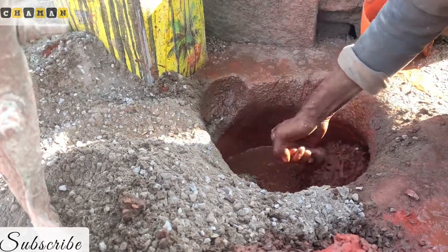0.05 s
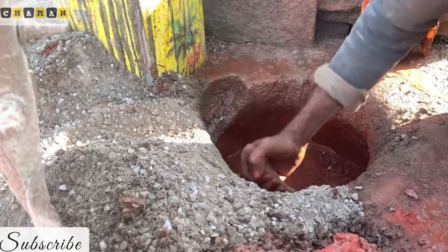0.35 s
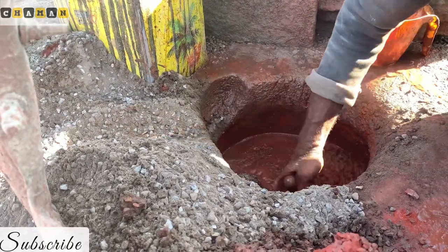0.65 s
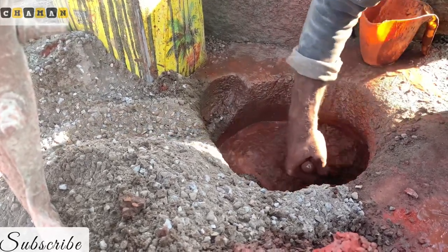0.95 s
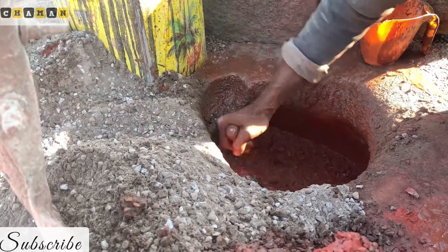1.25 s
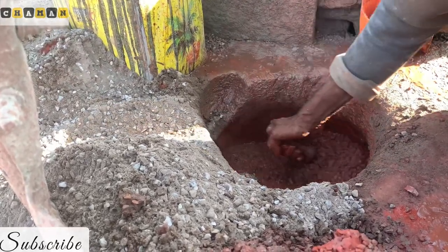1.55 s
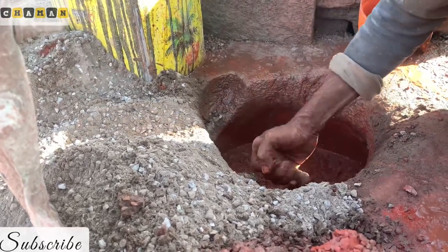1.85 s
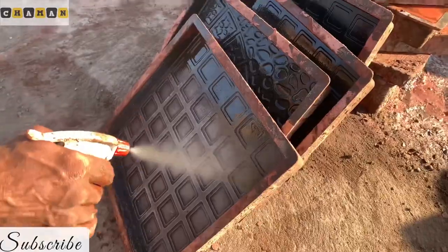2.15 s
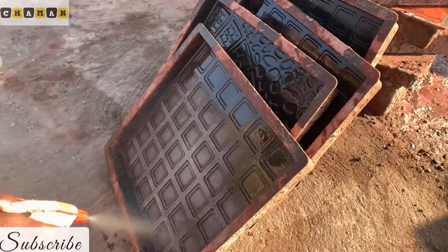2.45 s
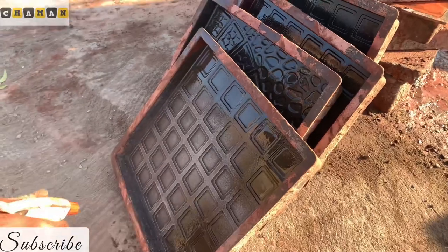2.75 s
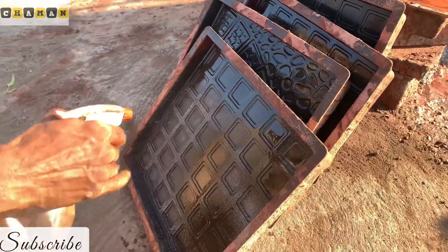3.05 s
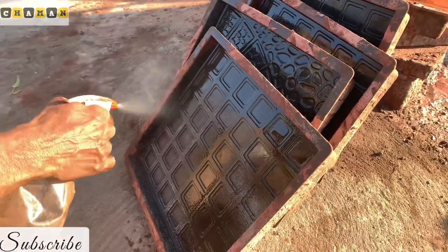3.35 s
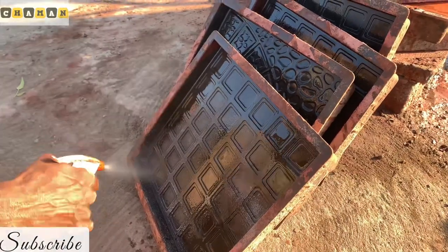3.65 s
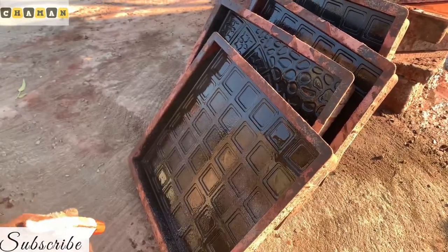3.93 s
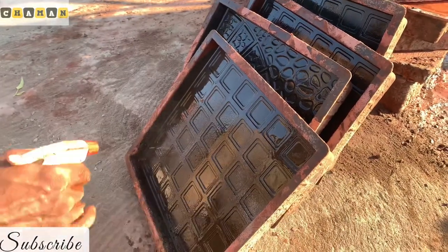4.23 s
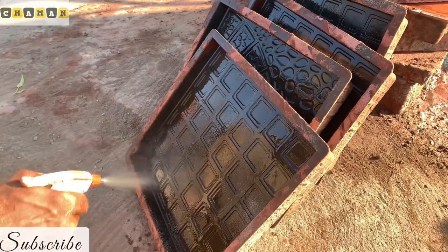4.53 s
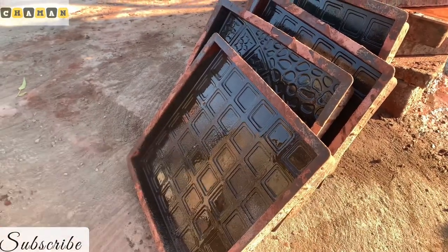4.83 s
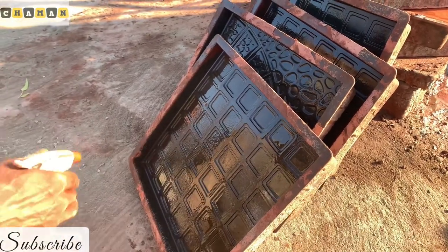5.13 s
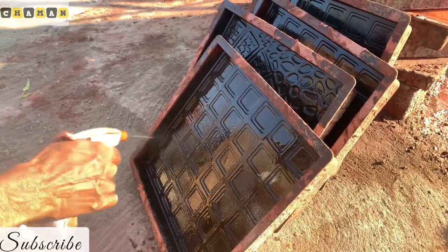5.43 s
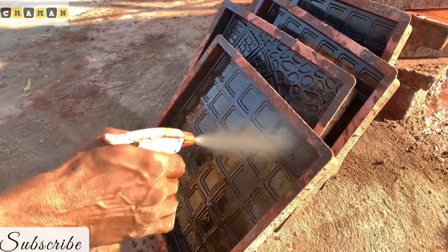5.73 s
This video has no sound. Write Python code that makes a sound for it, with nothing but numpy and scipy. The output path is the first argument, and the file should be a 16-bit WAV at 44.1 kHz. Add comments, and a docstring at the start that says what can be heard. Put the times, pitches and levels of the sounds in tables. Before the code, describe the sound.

Outdoors, close to the microphone, gritty cement slurry is scooped around a hollow pit with scrapes, sloshes and dull plops above a low rumble. The scene then changes abruptly to a hand spray bottle, pumped ten times at an even pace. Its trigger clicks and the mist hisses, sometimes with a faint rising and falling whistle, while a far engine slowly gets louder.

```python
"""A hand scoop stirs gritty wet cement in a small pit, outdoors at a tile maker's, over a low rumble.
Bursting air pockets make the cement slosh and gurgle, while sand crunches and the scoop scrapes.
After two seconds the scene changes: a trigger bottle sprays ten squirts onto plastic moulds.
Each is a clicking trigger and a hiss that swells with the pressure, often with a thin whistle
that rises and falls. A distant engine drones behind the spray."""
import sys
import numpy as np
from scipy import signal
from scipy.fft import rfft, irfft, next_fast_len
from scipy.io import wavfile
from scipy.ndimage import uniform_filter1d

SR = 44100
rng = np.random.default_rng(int(sys.argv[2]) if len(sys.argv) > 2 else 0)


def wrap_up_sound(samples):
    """Save the sound to the file named by the first command line argument, as 16-bit audio."""
    columns = np.atleast_2d(samples).T
    # keep every value between -1 and 1, then stretch to whole-number steps
    tamed = np.clip(columns, -1, 1)
    steps = np.round(tamed * 32767).astype(np.int16)
    wavfile.write(sys.argv[1], SR, steps)


N = 259308
TIME = np.arange(N) / SR
FFT_SIZE = next_fast_len(N + SR // 10)
SCENE_CHANGE_S = 2.004

# Levels in a table compare its rows; the functions set the final loudness.
# strokes of the scoop along the sandy wall: t/s, sand level/dB, scoop level/dB, rise/s, fall/s
STROKES = [(.15, -37.5, -39.5, .08, .11), (.385, -36.5, -38, .075, .04), (.69, -36.5, -40, .05, .12),
           (.99, -40, -38, .06, .05), (1.10, -38.5, -33.5, .035, .03), (1.485, -37.5, -43.5, .055, .04),
           (1.585, -39, -36.5, .055, .075), (1.81, -39.5, -38.5, .055, .045), (1.965, -41, -42, .03, .05)]
# the scoop shoves cement and opens an air pocket: t/s, slosh level/dB, pocket f/Hz, pocket level/dB
SHOVES = [(.02, -48, 770, -45), (.548, -25, 1370, -31), (0.598, -39, 1000, -33), (.638, -18.5, 875, -27.5),
          (1.389, -45, 1184, -39), (1.454, -29, 1260, -37), (1.536, -24, 880, -31.5)]
# the scoop lifts and a pocket closes: t/s, f/Hz, level/dB
LIFTS = [(1.11, 1010, -37), (1.82, 1244, -43.5)]
# big air pockets squeezed flat: t/s, f/Hz, level/dB
SQUELCHES = [(.278, 925, -35.5), (.318, 1210, -38), (.69, 2410, -40.5), (1.09, 1850, -42),
             (1.106, 3760, -36.5)]
# lumps of cement falling back: t/s, level/dB, f/Hz
PLOPS = [(0.405, -15, 262), (0.542, -15, 397), (0.553, -14.5, 560), (0.626, -18, 527), (0.654, -15.5, 262),
         (0.727, -15.5, 320), (0.795, -13, 256), (0.84, -19.5, 374), (1.449, -16.5, 540),
         (1.4855, -11.5, 510), (1.506, -13, 554), (1.5305, -15.5, 535)]
# stones snapping against the scoop: t/s, level/dB
STONES = [(.2745, -27), (.3020, -26.5), (.3796, -30), (1.844, -35)]
# the hollow note of the air in the pit: t/s, f/Hz, level/dB
PIT_NOTE = [(.03, 522, -32), (.17, 614, -49), (.5, 593, -38), (.65, 555, -28), (.76, 653, -40.5),
            (1.3, 624, -48), (1.5, 526, -28.5), (1.66, 530, -33.5), (1.76, 540, -51)]
# pitches at which the pit and the scoop ring: f/Hz, width/Hz, level/dB
PIT_RINGS = [(257, 104, 1.5), (394, 42, 2.5), (530, 117, -6), (844, 55, -3.5), (1030, 33, -11)]
SCOOP_RINGS = [(1286, 153, 1.1), (1960, 110, 3.5), (3990, 650, -2.6)]
# tone colour (how strong each pitch is) of the sand: f/Hz, level/dB
SAND_COLOUR = [(600, 5), (1200, 3.5), (2800, 0.5), (4100, 0), (6500, 0), (9000, 3), (11500, 3.5),
               (16000, -8)]

# trigger squeezes: t/s, held/s, first click level/dB, click gap/s, second click level/dB, hiss level/dB
SQUEEZES = [(2.036, 0.17, -34.5, 0.0061, -40, -33), (2.396, 0.18, -33.5, 0.0054, -41, -31),
            (2.7803, 0.18, -42, 0.011, -34, -31.5), (3.172, 0.18, -37, 0.0095, -28, -31.5),
            (3.562, 0.18, -35, 0.0088, -31.5, -30.5), (3.9492, 0.2, -30.5, 0.011, -33.5, -33.5),
            (4.354, 0.2, -29.5, .028, -53, -35.5), (4.7551, 0.19, -38, 0.011, -29, -30.5),
            (5.194, 0.21, -28.5, 0.0093, -40, -34.5), (5.6521, 0.21, -45, 0.012, -32, -31.5)]
# the trigger catches or springs back: t/s, level/dB
CATCHES = [(4.201, -44), (4.413, -32.5), (4.5833, -43), (4.955, -34), (4.9875, -42)]
# whistles of the nozzle: middle t/s, top f/Hz, level/dB, time from middle to top pitch/s
WHISTLES = [(2.535, 2920, -47, 0), (2.938, 2750, -45.5, -0.039), (3.283, 2750, -43, 0.036),
            (3.724, 2770, -38.5, -0.028), (4.897, 2586, -36.5, -.004), (5.358, 2470, -44, -.016),
            (5.813, 2690, -44, -0.0071)]
# rising chirps as the mist starts: t/s, f/Hz, level/dB
CHIRPS = [(2.868, 3710, -35), (3.646, 3700, -41)]
# a soft knock of the bottle: t/s, level/dB, f/Hz
KNOCKS = [(2.9893, -11, 275)]
# tone colours of the mist and of the clicks: f/Hz, level/dB
MIST_COLOUR = [(600, -15.5), (2400, -1), (4600, 2), (6600, -3.5), (10500, 3.5), (13400, -0.5), (15600, 1.5)]
CLICK_COLOUR = [(600, -3), (2000, 0), (4000, 1), (6300, -5.5), (11000, 4), (16000, 1)]

# the distant engine grows louder: t/s, level/dB
ENGINE_LEVELS = [(2.03, -48), (2.75, -36), (3.03, -30), (5.88, -25)]
# the tones in its note: multiple of the lowest pitch, level/dB
ENGINE_TONES = [(1, -5.5), (2, -17)]
# tone colours of the background noises: f/Hz, level/dB
PIT_RUMBLE_COLOUR = [(20, -36), (45, -9.5), (65, -0.5), (130, -1), (180, -4.5), (250, -15.5), (1000, -47.5)]
YARD_RUMBLE_COLOUR = [(20, -45), (45, -2), (75, 4), (100, -1), (125, 0.5), (160, -5.5), (220, -11.5),
                      (350, -21), (1200, -61)]
YARD_AIR_COLOUR = [(100, -35), (350, 6), (650, 1.5), (1100, 5), (2000, -7), (4000, -17), (16000, -54)]
# how much sound goes straight to the microphones: f/Hz, share from 0 to 1
DIRECT_SHARE = [(300, 0.85), (1300, 0.78), (2550, 0.01), (3150, 1), (5300, 0), (7000, 0.72), (8500, 1),
                (11000, 0.9), (13500, 1)]


def stirring():
    """The scoop pushes through wet cement: it sloshes, scrapes and crunches, and lumps plop back."""
    push, drag = stroke_forces()
    liquid = slosh(push) + gurgles() + pit_air()
    rubbing = scrape(drag) + squelch(drag)
    grit = sand(push) + stones()
    wet = microphones(liquid + pit_echo(rubbing), left_late_ms=0.0084, scatter_pan_db=4.5)
    gritty = microphones(pit_echo(grit), left_late_ms=0.1803, scatter_pan_db=-7)
    plops = from_db(4) * thuds(PLOPS, cycles=12.6)
    return wet + gritty + plops


def stroke_forces(trickle_db=-52.5):
    """Each stroke is one swell of push on the sand and drag on the scoop; in between, sand trickles."""
    power = from_db(trickle_db) ** 2
    for s, sand_db, scoop_db, rise, fall in STROKES:
        power = power + (from_db([[sand_db], [scoop_db]]) * swell(s, rise, fall)) ** 2
    return np.sqrt(power)


def slosh(push, churn_db=-42, wake_db_per_s=62):
    """Bursting air pockets ring the pit. Strokes churn the cement; each shove adds a surge and a wake."""
    pockets = resonate(grains(per_s=700, spread_db=3.5), PIT_RINGS)
    pockets = signal.sosfilt(signal.butter(2, 1300, fs=SR, output="sos"), pockets)
    power = (from_db(churn_db) * (push / push.max()) ** 0.24) ** 2  # follows the strokes only loosely
    for s, db, _, _ in SHOVES:
        surge = swell(s, rise_s=0.01, fall_s=0.041)
        wake = (TIME > s) * from_db(-4 - wake_db_per_s * np.abs(TIME - s))
        power = power + (from_db(db - 1) * np.maximum(surge, wake)) ** 2
    return np.sqrt(power) * evened(pockets, span_s=0.033)


def gurgles():
    """Air pockets sink in pitch as they open behind a shove, and rise as the lifting scoop closes them."""
    pockets = [(s, hz, db) for s, _, hz, db in SHOVES]
    opening = glides(pockets, length_s=0.12, octaves_per_s=-2.6, sharpness=14)
    closing = glides(LIFTS, length_s=0.2, octaves_per_s=7.1, sharpness=18)
    return from_db(1) * (opening + closing)


def pit_air(width_hz=31.5):
    """The air in the pit rings with two hollow notes that shift as the arm and the cement move."""
    s, pitch, db = np.transpose(PIT_NOTE)
    hz = np.interp(TIME, s, pitch)
    bursts = grains(per_s=900, spread_db=2.5)
    low = evened(moving_ring(bursts, hz, width_hz), span_s=0.062)
    high = evened(moving_ring(bursts, 1.51 * hz, width_hz), span_s=0.062)
    return from_db(np.interp(TIME, s, db)) * (low + from_db(-7.5) * high)


def scrape(drag):
    """Many tiny slips along the wall make the scoop ring."""
    ringing = resonate(grains(per_s=1200, spread_db=1.5), SCOOP_RINGS)
    return from_db(-1) * drag * evened(ringing, span_s=0.063)


def squelch(drag):
    """The scoop squeezes out small bubbles and flattens a few big air pockets."""
    fizz = from_db(-5) * drag * bubbles()
    return fizz + glides(SQUELCHES, length_s=0.045, octaves_per_s=2, sharpness=33)


def bubbles(per_s=420, low_hz=1100, high_hz=5000, cycles=45, spread_db=3, pitch_rise=0.057):
    """Small bubbles pop at random, each ringing briefly and rising in pitch."""
    out, t = np.zeros((3, N)), TIME[:SR // 20]
    for when, height, size, *phases in rng.random((int(per_s * SCENE_CHANGE_S), 6)):
        hz = low_hz * (high_hz / low_hz) ** height
        age = hz * t / cycles  # reaches 1 when the ring has died away
        turns = np.cumsum(hz * (1 + pitch_rise * age)) / SR + np.array(phases)[:, None]
        ring = (1 - np.exp(-hz * t)) * np.sin(2 * np.pi * turns)
        add(out, when * SCENE_CHANGE_S, from_db(spread_db * size - 60 * age) * ring)
    return out / out[:, :int(SCENE_CHANGE_S * SR)].std()


def sand(push):
    """Sand grains crunch faster and louder under a harder stroke."""
    crunch = evened(grains(per_s=3000 * np.sqrt(push / push.max()), spread_db=0), span_s=0.025)
    return from_db(3 + 1.7 * drift(35)) * push * coloured(crunch, SAND_COLOUR)


def stones():
    """Stones hit the scoop with a short, bright snap."""
    cracks = snaps(STONES, fade_s=0.014, tail_db=-20, tail_fade_s=0.04)
    return resonate(cracks, [(11300, 4200, 11)])


def pit_echo(x, trips_per_s=311.7, echo_share=0.41, dull_hz=3000):
    """Sound bounces between the walls of the pit, duller on every round trip."""
    hz = np.fft.rfftfreq(FFT_SIZE, 1 / SR)
    returned = echo_share / (1 + (hz / dull_hz) ** 2)
    delay = np.exp(-2j * np.pi * hz / trips_per_s)
    bounces = np.sqrt(1 - returned ** 2) / (1 - returned * delay)
    return irfft(rfft(x, FFT_SIZE) * bounces, FFT_SIZE)[..., :N]


def spray_bottle():
    """The trigger clicks, the nozzle hisses and whistles, and the bottle gives one soft knock."""
    hiss = mist()
    singing = microphones(whistles(), left_late_ms=0.11, scatter_pan_db=1)
    squirts = microphones(hiss + trigger_clicks(), left_late_ms=0.1799, scatter_pan_db=-3.5)
    return squirts + singing + thuds(KNOCKS, cycles=5.3)


def mist(rise_db=22, sag_db=1.5, shutoff_db_per_s=614):
    """Pressure builds, sags and collapses when the trigger is let go; the hiss of the mist follows it."""
    loudness = 0
    for s, held, _, _, _, db in SQUEEZES:
        start, full, release = s + 0.03, s + 0.66 * held, s + held
        still_to_build = np.maximum(full - TIME, 0) / (full - start)
        sagging = np.clip((TIME - full) / (release - full), 0, 1)
        shutoff_db = shutoff_db_per_s * np.maximum(TIME - release, 0)
        squirt_db = db - rise_db * still_to_build ** 2 - sag_db * sagging ** 2 - shutoff_db
        loudness = loudness + from_db(np.maximum(squirt_db, -150))
    hiss = coloured(grains(per_s=25000, spread_db=-1.5), MIST_COLOUR)
    return loudness * hiss * from_db(1.08 * drift(63))


def whistles(length_s=0.145, sharpness=95, overtone_db=-6, flicker_db=2.5):
    """The nozzle chirps as pressure builds, or sings a raspy note that rises and falls with it."""
    out = glides(CHIRPS, length_s=0.055, octaves_per_s=1.7, sharpness=sharpness)
    t = TIME[:int(length_s * SR)] - length_s / 2
    for s, top_hz, db, top_after_s in WHISTLES:
        octaves_down = 0.15 * ((t - top_after_s) / 0.05) ** 2
        hz = top_hz * 2 ** -octaves_down
        note = sum(from_db(overtone_db * k) * narrow_ring((k + 1) * hz, sharpness) for k in range(3))
        add(out, s - length_s / 2, from_db(db + flicker_db * drift(30)[:len(t)]) * note)
    return out


def trigger_clicks(spring_s=0.016, return_s=0.135, bounce_s=0.013):
    """A squeeze gives a double click and two spring ticks; let go, the trigger taps its stop twice."""
    clicks = list(CATCHES)
    for s, held, first_db, gap, second_db, _ in SQUEEZES:
        clicks += [(s, first_db), (s + gap, second_db)]
        clicks += [(s + spring_s, -45), (s + 2 * spring_s, -45)]
        back = s + held + return_s
        clicks += [(when, rng.normal(-55, 3)) for when in (back, back + bounce_s)]
    cracks = snaps(clicks, fade_s=0.022, tail_db=-12, tail_fade_s=0.18)
    return from_db(2) * coloured(cracks, CLICK_COLOUR)


def engine(hz=64.1, waver=0.0245):
    """A far exhaust note wavers a little and reaches the left microphone first."""
    phase = 2 * np.pi * np.cumsum(hz * (1 + waver * drift(5.93))) / SR
    left_right = phase + np.array([[1.0], [0]])
    note = sum(from_db(db + 2 * drift(2.5)) * np.sin(k * left_right) for k, db in ENGINE_TONES)
    return from_db(1) * level(ENGINE_LEVELS) * rms_one(note) * pan(-4)


def pit_rumble(eases_at_s=1.38, ease_db_per_s=5.5):
    """A low rumble lies under the stirring and eases off near its end."""
    db = -22.5 - ease_db_per_s * np.maximum(TIME - eases_at_s, 0)
    return from_db(db) * far_noise(PIT_RUMBLE_COLOUR, aimed_share=0.92, right_late_ms=-0.05)


def yard_background():
    """An uneven rumble grows slightly with the engine, beside a faint, steady rush of air."""
    engine_gain = level(ENGINE_LEVELS)
    loudness = (engine_gain / engine_gain.max()) ** 0.061 * from_db(-26 + 1.65 * drift(8.1))
    rumble = loudness * far_noise(YARD_RUMBLE_COLOUR, aimed_share=0.78, right_late_ms=2.36)
    air = from_db(-42) * far_noise(YARD_AIR_COLOUR, aimed_share=0.47, right_late_ms=0.39)
    return rumble * pan(-1.6) + air


def far_noise(colour, aimed_share, right_late_ms):
    """Distant noise: part comes from one direction, part from all around."""
    common = rng.standard_normal(N)
    aimed = np.array([common, np.roll(common, int(right_late_ms * SR / 1000))])
    around = rng.standard_normal((2, N))
    return coloured(np.sqrt(aimed_share) * aimed + np.sqrt(1 - aimed_share) * around, colour)


def microphones(x, left_late_ms, scatter_pan_db):
    """Two microphones share the direct sound (row 0); each gets its own scattered sound (rows 1, 2)."""
    hz, spectra = np.fft.rfftfreq(FFT_SIZE, 1 / SR), rfft(x, FFT_SIZE)
    share = at_hz(DIRECT_SHARE, hz)
    delay_s = np.array([[left_late_ms], [0]]) / 1000
    direct = spectra[0] * np.exp(-2j * np.pi * hz * delay_s)
    scattered = spectra[1:] * pan(scatter_pan_db)
    return irfft(np.sqrt(share) * direct + np.sqrt(1 - share) * scattered, FFT_SIZE)[:, :N]


def grains(per_s, spread_db):
    """Tiny random hits, in three rows: direct, scattered left, scattered right."""
    hits = rng.random((3, N)) < per_s / SR
    out, count = np.zeros((3, N)), hits.sum()
    sizes = from_db(spread_db * np.minimum(rng.exponential(1, count), 4))
    out[hits] = sizes * rng.choice([-1, 1], count)
    return rms_one(out)


def snaps(rows, fade_s, tail_db, tail_fade_s):
    """Sharp cracks with a weak rattling tail; each part drops 60 dB in its fade time."""
    out, t = np.zeros((3, N)), TIME[:SR // 10]
    shape = from_db(-60 * t / fade_s) + from_db(tail_db - 60 * t / tail_fade_s)
    for s, db in rows:
        add(out, s, from_db(db) * shape * rng.standard_normal((3, len(t))))
    return out


def thuds(rows, cycles):
    """Dull tones that die away within a few cycles."""
    out, t = np.zeros(N), TIME[:SR // 10]
    for s, db, hz in rows:
        onset = 1 - np.exp(-4 * hz * t)
        add(out, s, from_db(db - 60 * hz * t / cycles) * onset * np.sin(2 * np.pi * hz * t))
    return out


def glides(rows, length_s, octaves_per_s, sharpness):
    """Short ringing notes that slide up or down in pitch."""
    out, t = np.zeros((3, N)), TIME[:int(length_s * SR)] - length_s / 2
    for s, hz, db in rows:
        note = narrow_ring(hz * 2 ** (octaves_per_s * t), sharpness)
        add(out, max(s - length_s / 2, 0), from_db(db) * note)
    return out


def narrow_ring(hz, sharpness):
    """Noise rings a small air space, swelling and fading; more sharpness gives a purer note."""
    ring = moving_ring(rng.standard_normal((3, len(hz))), hz, hz.mean() / sharpness)
    return evened(ring, span_s=0.059) * np.sin(np.linspace(0, np.pi, len(hz))) ** 2


def moving_ring(x, hz, width_hz):
    """Make a sound ring at a pitch that follows hz."""
    turn = np.exp(2j * np.pi * np.cumsum(hz) / SR)
    return (turn * signal.lfilter([1], [1, -np.exp(-np.pi * width_hz / SR)], x / turn)).real


def resonate(x, rings):
    """Make a sound ring at steady pitches, given as rows of f/Hz, width/Hz, level/dB."""
    out = 0
    for k, (hz, width, db) in enumerate(rings):
        r = np.exp(-np.pi * width / SR)
        poles = [1, -2 * r * np.cos(2 * np.pi * hz / SR), r * r]
        ring = (1 - r * r) / 2 * signal.lfilter([1, 0, -1], poles, x + 1e-18)
        out = out + (-1) ** k * from_db(db) * ring
    return out


def coloured(x, colour):
    """Give a sound a tone colour; white noise keeps its power."""
    gain = from_db(at_hz(colour, np.fft.rfftfreq(FFT_SIZE, 1 / SR)))
    return irfft(rfft(x, FFT_SIZE) * rms_one(gain), FFT_SIZE)[..., :N]


def drift(rate_hz, step=40):
    """A smooth random wander, about 1 in size."""
    r = np.exp(-2 * np.pi * rate_hz * step / SR)
    slow = signal.lfilter([1], [1, -2 * r, r * r], rng.standard_normal(N // step + 2002))[2000:]
    return np.interp(np.arange(N) / step, np.arange(len(slow)), rms_one(slow))


def swell(s, rise_s, fall_s):
    """A rounded swell of height 1 that peaks at time s."""
    distance = (TIME - s) / np.where(TIME < s, rise_s, fall_s)
    return np.exp(-0.5 * np.minimum(distance ** 2, 60))


def evened(x, span_s):
    """Hold the level near 1 over every short span."""
    return x / np.sqrt(np.abs(uniform_filter1d(x ** 2, int(span_s * SR) + 1)) + 1e-12)


def add(track, s, sound):
    """Mix a short sound into a track at time s."""
    start = int(s * SR)
    track[..., start:start + sound.shape[-1]] += sound[..., :max(N - start, 0)]


def at_hz(rows, hz):
    """Read a table between its pitches, giving every octave equal room."""
    pitches, values = np.transpose(rows)
    return np.interp(np.log(hz + 1), np.log(pitches), values)


def level(rows):
    """Gain at every sample, from rows of t/s, level/dB."""
    return from_db(np.interp(TIME, *np.transpose(rows)))


def pan(db):
    """Left and right gains; positive db makes the left louder."""
    return from_db([[db / 2], [-db / 2]])


def rms_one(x):
    """Scale to an average level (rms) of 1."""
    return x / np.sqrt(np.mean(x ** 2) + 1e-20)


def from_db(db):
    """Turn decibels into a gain."""
    return 10 ** (np.asarray(db) / 20)


def scene():
    """Stirring at the pit, then a sudden change to spraying in the yard."""
    pit = stirring() + pit_rumble()
    background = yard_background()
    yard = spray_bottle() + engine() + background
    fade_out = np.clip((SCENE_CHANGE_S - TIME) / 0.0034, 0, 1)
    fade_in = np.clip((TIME - SCENE_CHANGE_S + 0.004) / 0.033, 0, 1)
    return pit * fade_out + yard * fade_in


def record(dry):
    """The highest treble is cut off steeply."""
    return signal.sosfilt(signal.ellip(12, 0.1, 80, 15900, fs=SR, output="sos"), dry)


dry = scene()
out = record(dry)
wrap_up_sound(out)
```